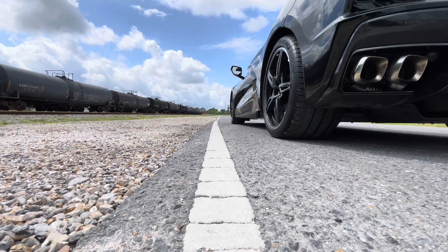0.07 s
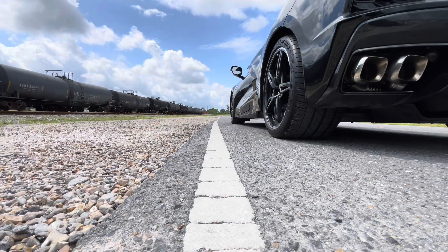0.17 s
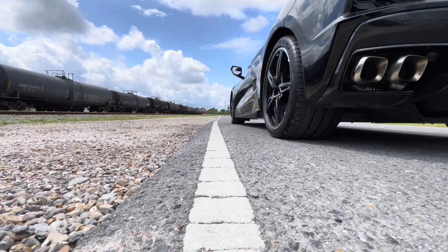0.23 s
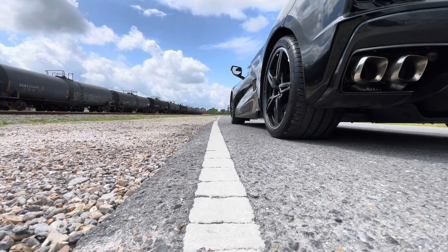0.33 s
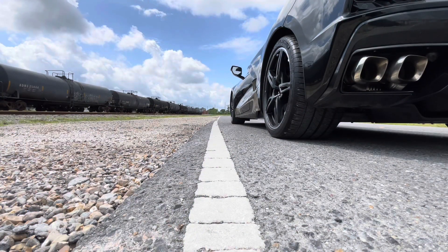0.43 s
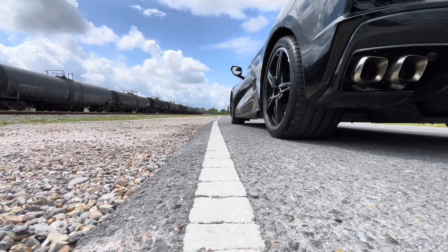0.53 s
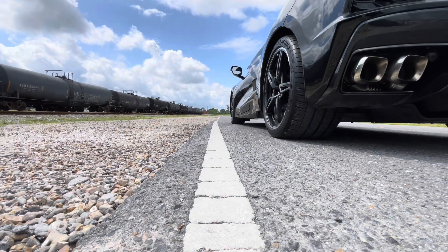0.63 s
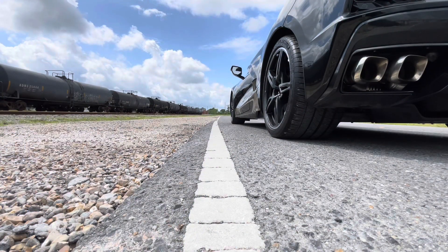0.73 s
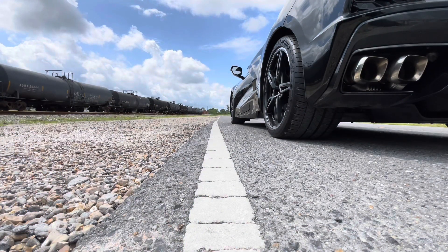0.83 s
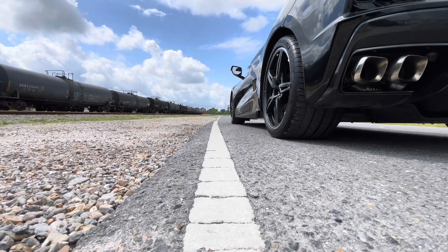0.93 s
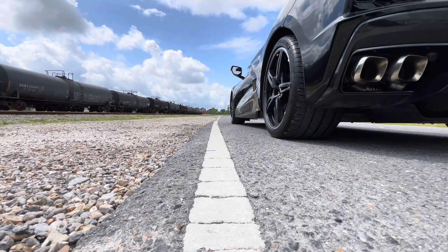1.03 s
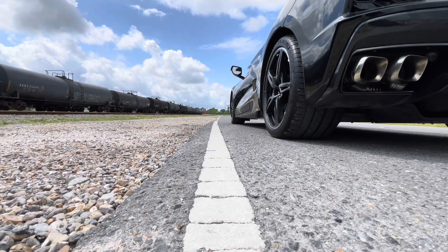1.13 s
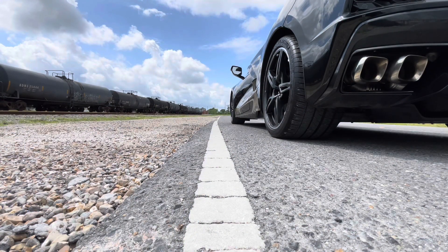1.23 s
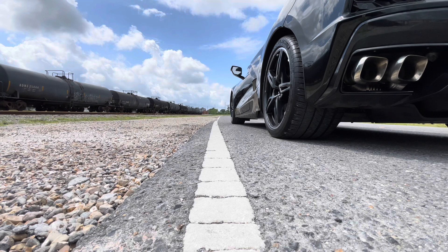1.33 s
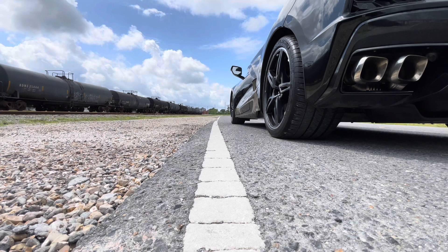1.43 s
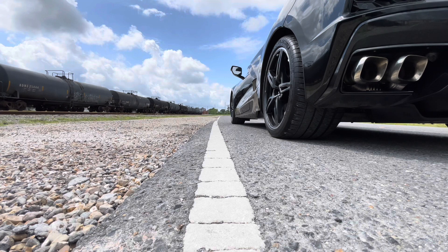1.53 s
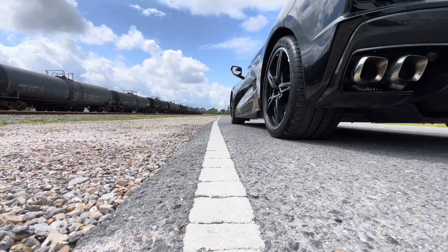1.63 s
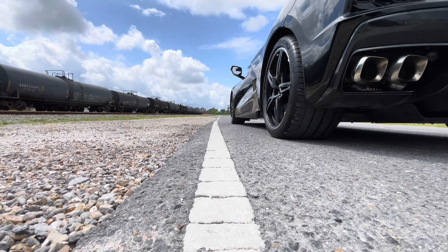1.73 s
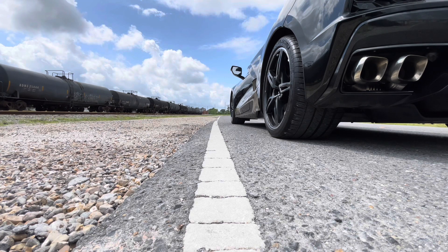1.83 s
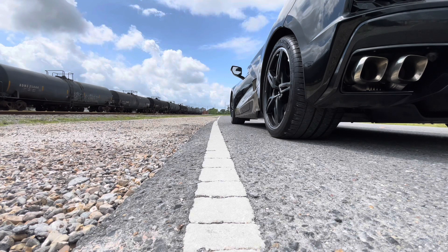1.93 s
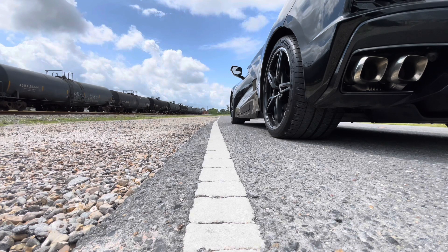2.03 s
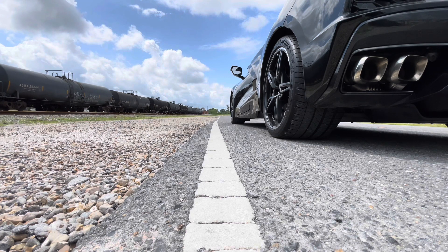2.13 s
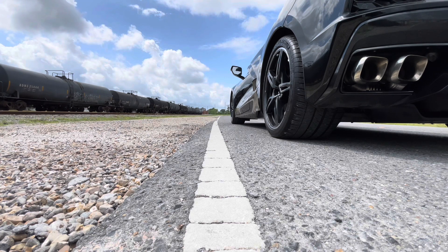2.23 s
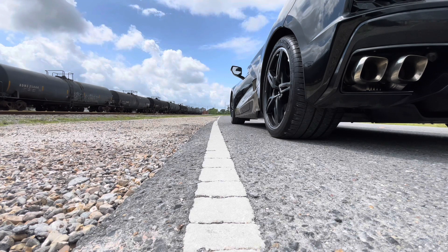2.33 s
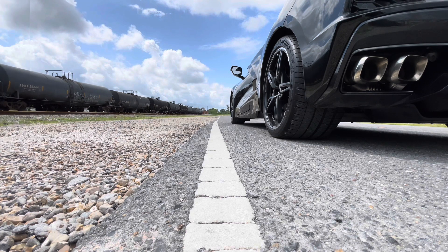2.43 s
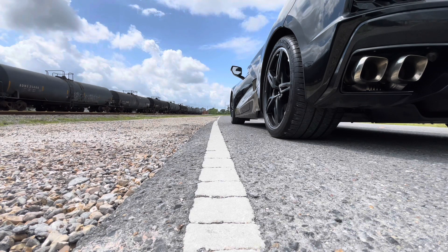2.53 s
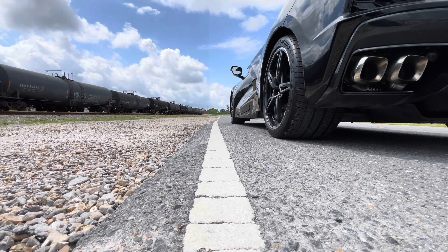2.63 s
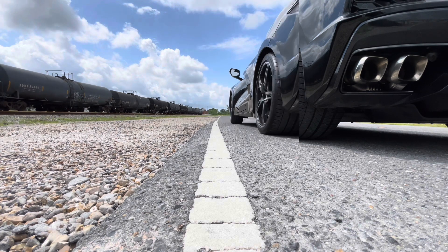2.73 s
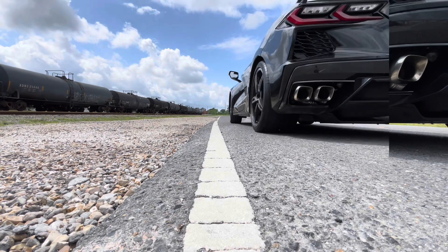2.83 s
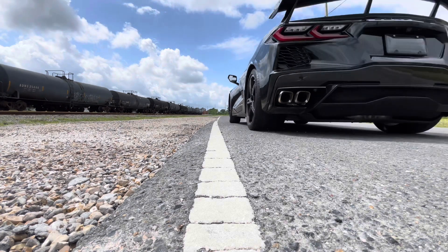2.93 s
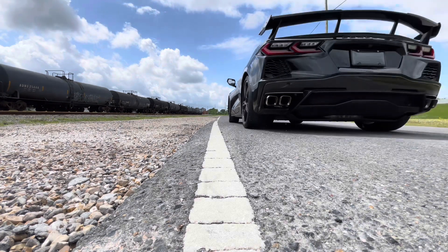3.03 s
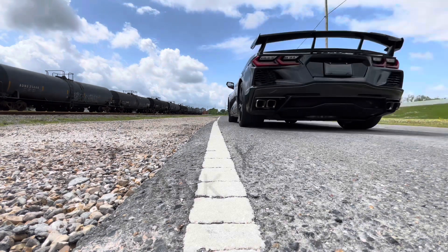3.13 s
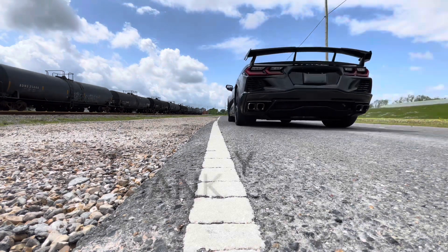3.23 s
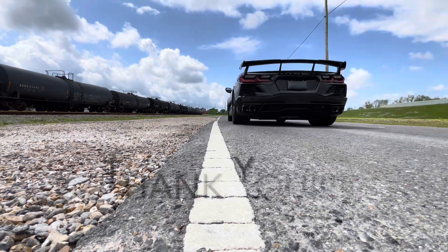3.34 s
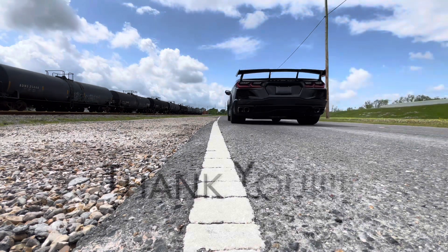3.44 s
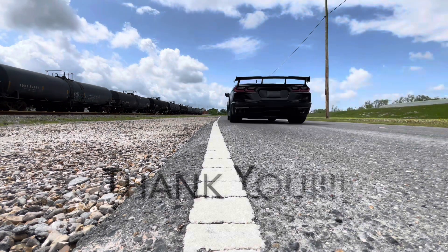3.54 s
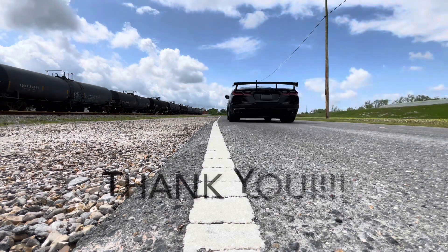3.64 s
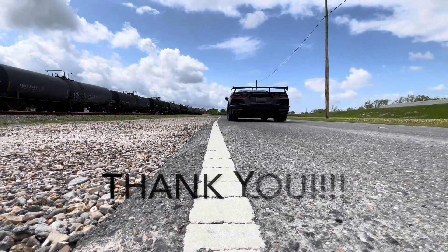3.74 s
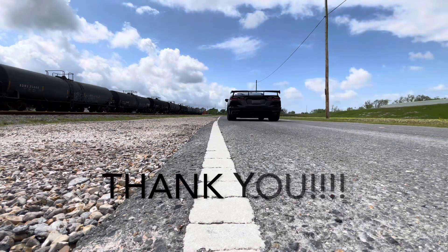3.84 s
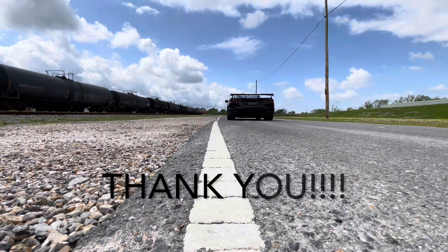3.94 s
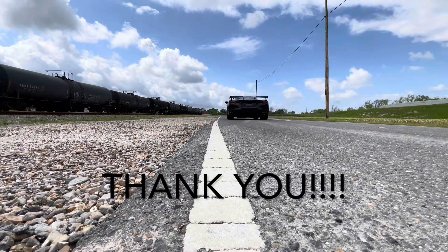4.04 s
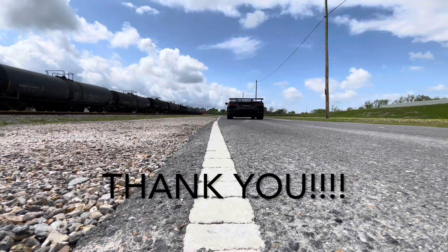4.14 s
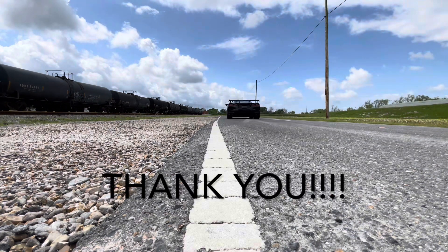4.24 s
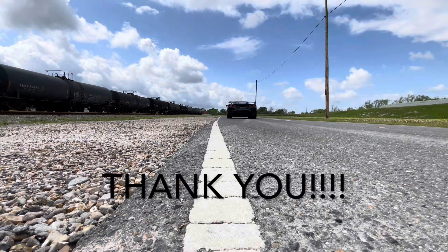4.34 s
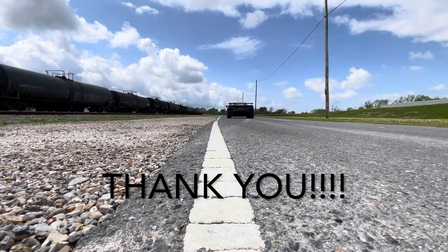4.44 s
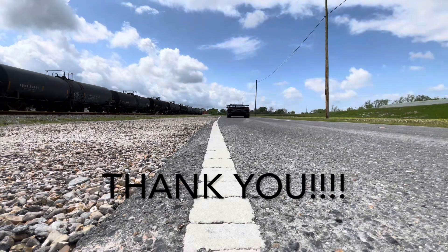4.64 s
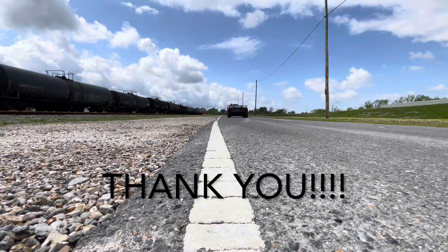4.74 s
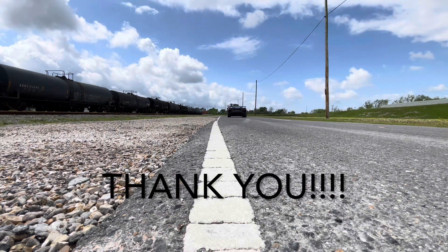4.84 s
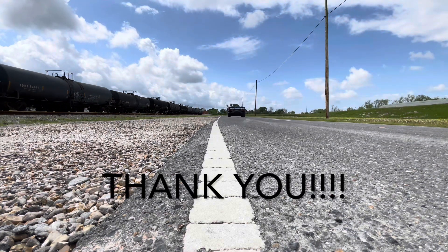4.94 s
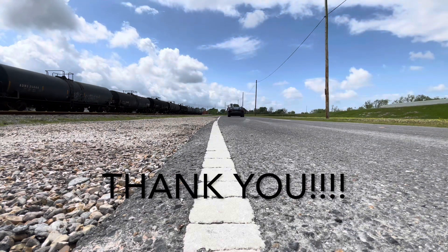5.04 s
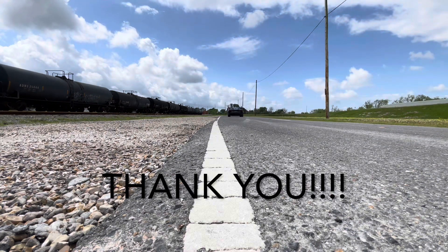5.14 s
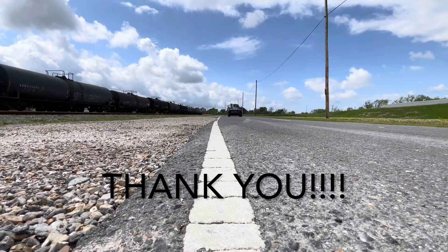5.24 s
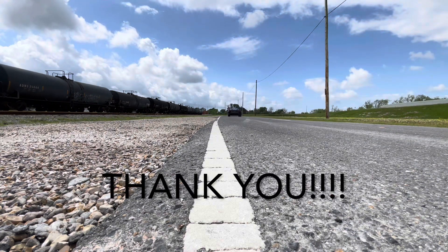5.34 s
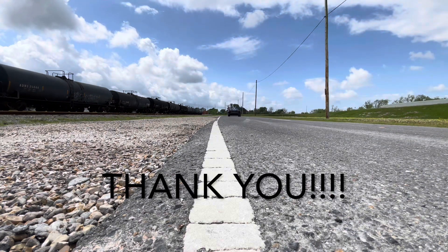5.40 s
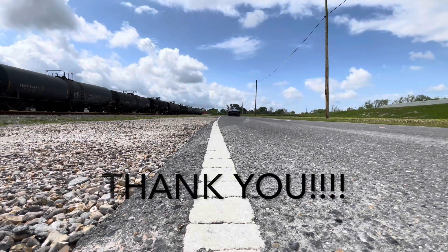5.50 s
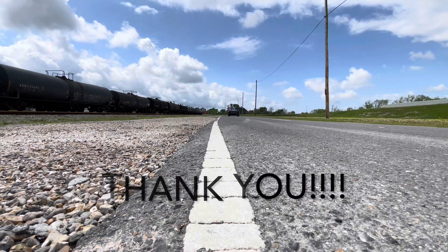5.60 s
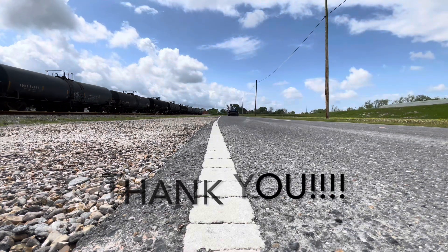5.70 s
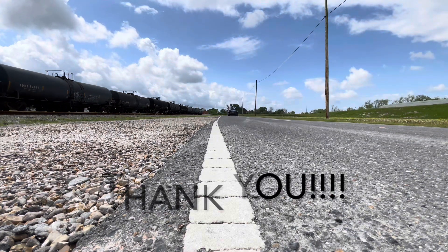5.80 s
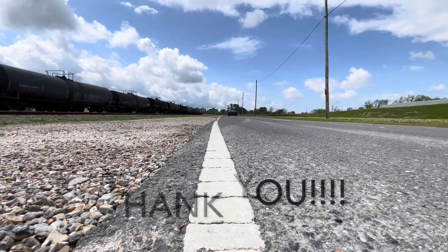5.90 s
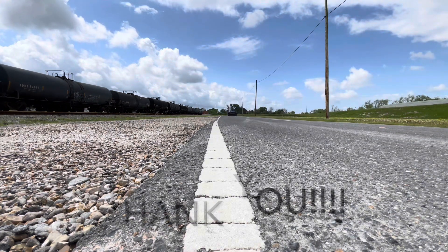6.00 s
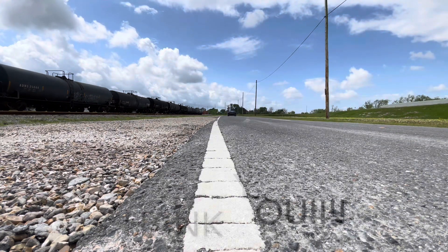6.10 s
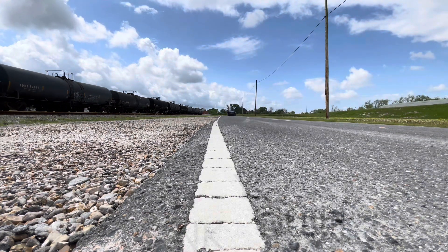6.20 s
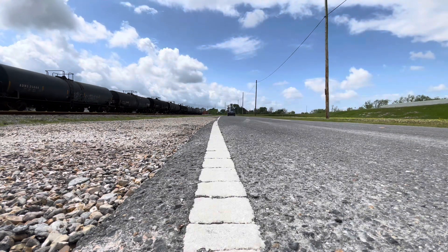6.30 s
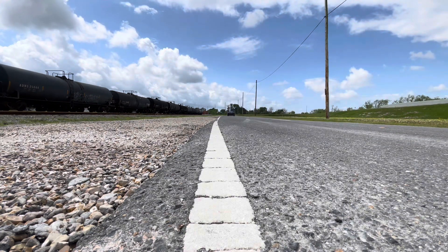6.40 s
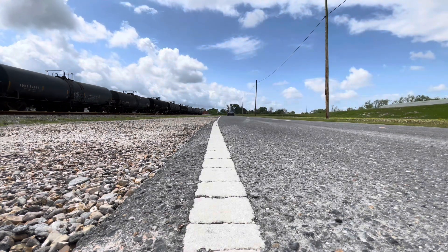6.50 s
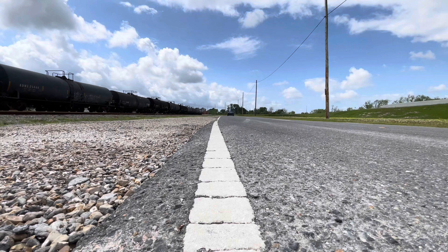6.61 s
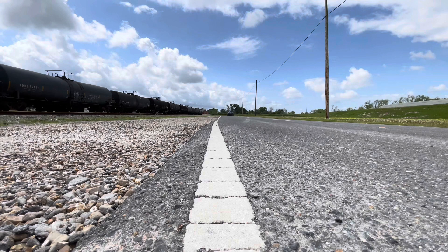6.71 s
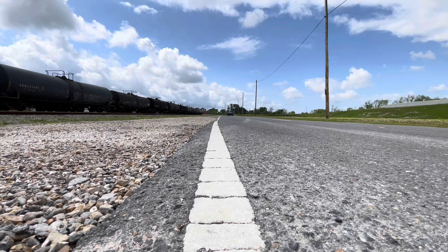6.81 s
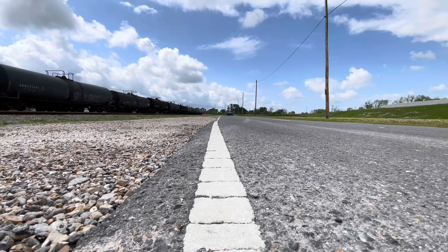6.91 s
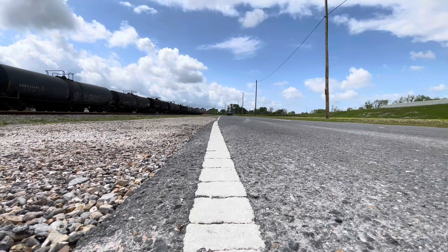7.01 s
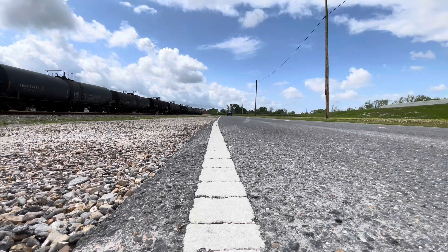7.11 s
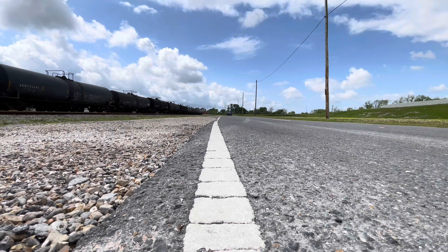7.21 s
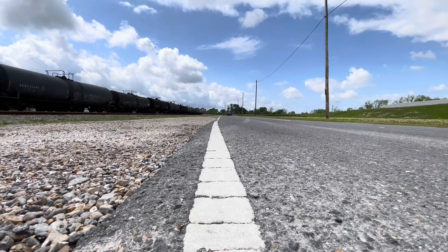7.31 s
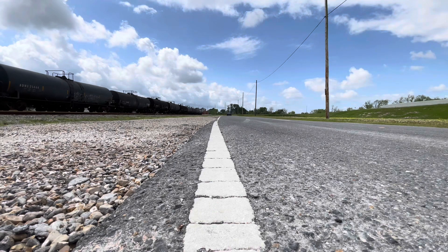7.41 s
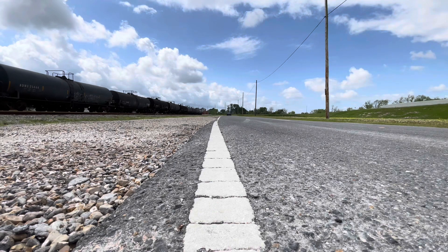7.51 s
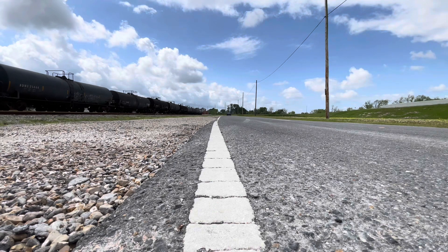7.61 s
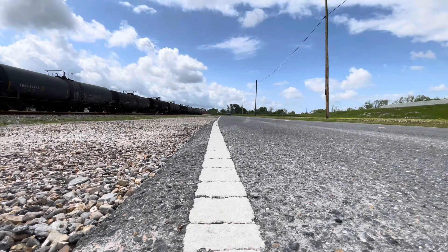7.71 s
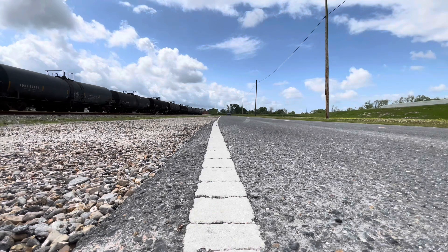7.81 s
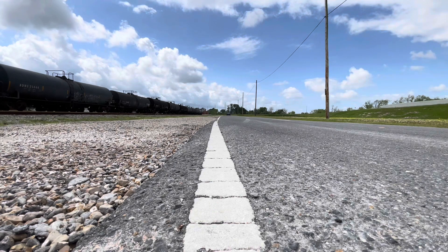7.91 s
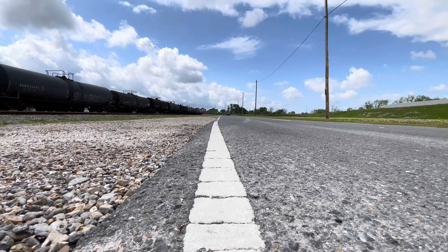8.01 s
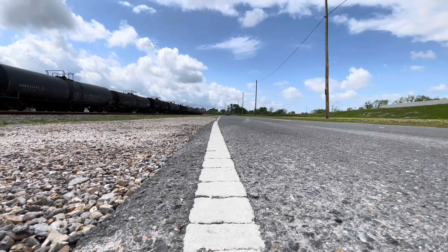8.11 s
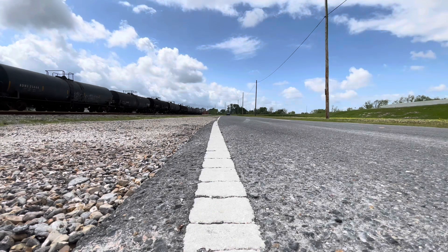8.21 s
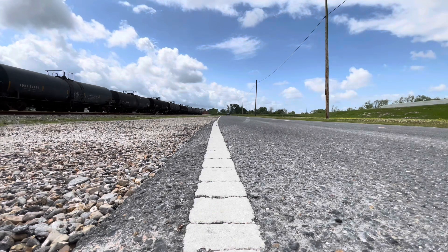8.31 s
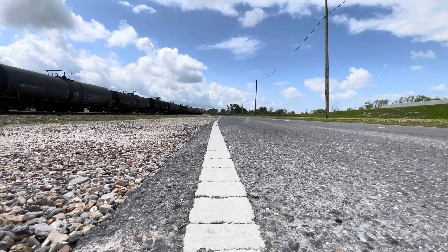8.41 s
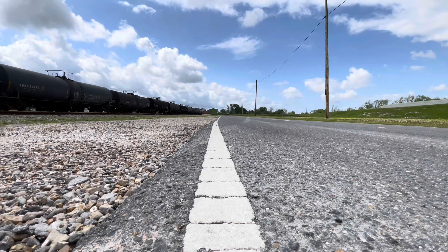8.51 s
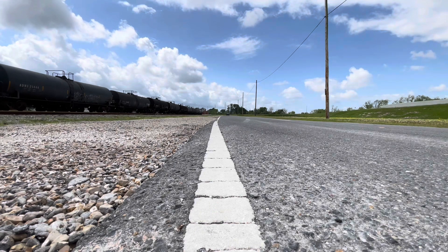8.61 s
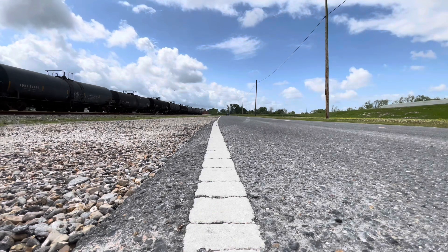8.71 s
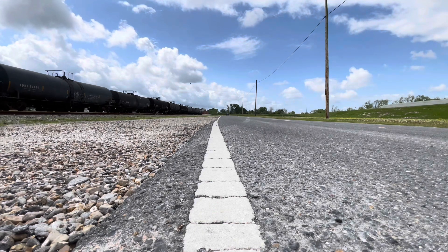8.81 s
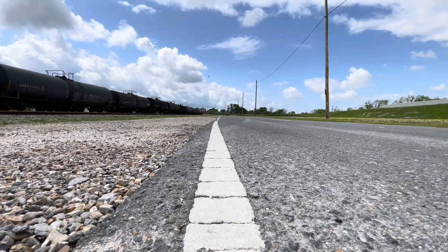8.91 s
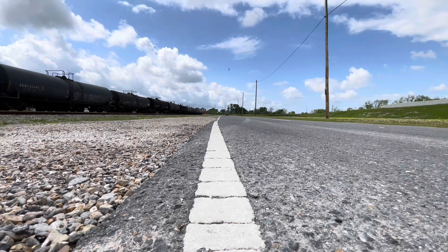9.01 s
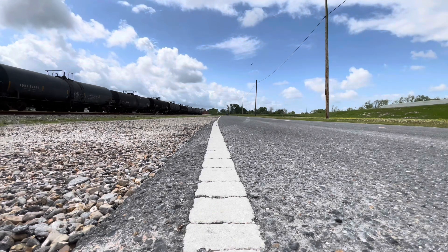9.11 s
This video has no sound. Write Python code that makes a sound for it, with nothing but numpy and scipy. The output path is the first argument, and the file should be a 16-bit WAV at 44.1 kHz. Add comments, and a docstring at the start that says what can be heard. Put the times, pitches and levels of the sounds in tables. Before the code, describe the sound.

A V8 sports car burbles unevenly close by, then chirps its tyres and roars away through two upshifts with cracking exhaust, fading down the road.

```python
"""A V8 sports car burbles on its launch limiter: two throbbing sines, ringing thuds, puffing noise, pops.
Its tyres chirp as short rough tones, then it launches and pulls away: a sum of engine orders, firing
shocks and pulsing gas noise, set by throttle and distance. Bursts of noise crack at lifts and two
upshifts, with a faint whistle after the first; later a breeze rumbles as low noise on the microphone."""
import sys
import numpy as np
from scipy import signal
from scipy.fft import rfft, irfft, next_fast_len
from scipy.io import wavfile
from scipy.ndimage import uniform_filter1d

SR = 44100
rng = np.random.default_rng(int(sys.argv[2]) if len(sys.argv) > 2 else 0)


def to_wav(s):
    """Save 16-bit WAV."""
    ch = np.atleast_2d(s).T  # columns
    pcm = np.round(np.clip(ch, -1, 1) * 32767)  # PCM
    wavfile.write(sys.argv[1], SR, pcm.astype(np.int16))


N = 403515


def amp(db):
    """Decibels to gain."""
    return 10 ** (np.asarray(db) / 20)


def unit(x):
    """Scale to rms 1."""
    return x / np.sqrt(np.mean(x ** 2) + 1e-20)


def even(x):
    """Divide all channels by the running rms of the first."""
    power = np.atleast_2d(x)[0] ** 2
    return x / np.sqrt(np.abs(uniform_filter1d(power, size=6000)) + 1e-12)


def bump(x, centre, half_width):
    """Gaussian bell of height 1, down to 1/e at half_width."""
    return np.exp(-((x - centre) / half_width) ** 2)


def along(points, hz):
    """Interpolate (f/Hz, value) points on a log frequency axis."""
    f, v = np.transpose(points)
    return np.interp(np.log(hz + 1), np.log(f + 1), v)


def curves(rows):
    """One value per sample for each column after the time."""
    s, *cols = np.transpose(rows)
    return [np.interp(np.arange(N) / SR, s, c) for c in cols]


def wobble(rate):
    """Slow random curve, rate knots a second."""
    return np.interp(np.arange(N) * rate / SR, np.arange(2048), rng.standard_normal(2048))


def strike(s, rise_s, decay_s):
    """Two-sided exponential envelope, 1 at time s."""
    t = np.arange(N) / SR - s
    return np.exp(-np.minimum(np.abs(t) / np.where(t < 0, rise_s, decay_s), 20))


def filtered(x, response):
    """Multiply the spectrum of x by a function of frequency."""
    m = next_fast_len(N + 8192, True)
    return irfft(rfft(x, m) * response(np.fft.rfftfreq(m, 1 / SR)), m)[..., :N]


def colour(x, spectrum):
    """Filter x by a (f/Hz, gain/dB) curve."""
    return filtered(x, lambda hz: amp(along(spectrum, hz)))


def band(x, lo_hz, hi_hz):
    """Steep band-pass."""
    return filtered(x, lambda hz: 1 / np.sqrt((1 + (lo_hz / (hz + 1)) ** 20) * (1 + (hz / hi_hz) ** 20)))


def ringing(x, modes):
    """Resonators of alternating sign in parallel: (f/Hz, bandwidth/Hz, gain/dB)."""
    def response(f):
        total = 0
        for k, (centre, width, db) in enumerate(modes):
            damping = 1j * f * width
            total = total + (-1) ** k * amp(db) * damping / (centre * centre - f * f + damping)
        return total

    return filtered(x, response)


def rush(spectrum):
    """Coloured mid and side noise, mid at rms 1."""
    # stereo width of noise: f/Hz, side minus mid/dB
    width = [(60, -15), (120, -11), (360, -2.5), (700, 2), (1200, 0.5), (2100, -6.5), (3800, -1),
             (7000, -6), (9500, 4.5), (12000, 1)]
    noise = colour(rng.standard_normal((2, N)), spectrum)
    return np.array([noise[0], colour(noise[1], width)]) / np.std(noise[0])


def stereo(mid_side, spread_db, pan_db):
    """Left and right from mid and side; pan_db is left minus right."""
    mid, side = mid_side[0], mid_side[1] * amp(spread_db)
    return np.array([(mid + side) * amp(pan_db / 2), (mid - side) * amp(-pan_db / 2)])


def puffs(cycle, scatter_db, sharpness, count):
    """Gas flow: count puffs a cycle, each of its own size, each decaying until the next."""
    stroke = cycle * count
    size = amp(scatter_db * rng.standard_normal(8192))[stroke.astype(int)]
    return unit(size * np.exp(-sharpness * (stroke % 1)))


def pull_away():
    """Engine orders, shocks and firing-pulsed gas noise in four registers, dulling with distance."""
    # engine under way: t/s, rate/(cycles/s)
    speed = [(2.7, 21.7), (2.8, 23.5), (2.9, 27), (3.05, 29.2), (3.25, 27.5), (3.45, 23.2), (3.62, 22.3),
             (3.77, 28.7), (4, 35.3), (4.48, 51.6), (4.64, 53.2), (4.7, 47), (4.756, 43.6), (4.83, 37.3),
             (4.95, 31.5), (5.07, 32.7), (5.18, 32.8), (5.3, 34.8), (6.6, 48), (6.83, 49), (6.95, 35.7),
             (7.41, 37.5), (8.55, 42.7), (9.15, 42)]
    # launch, lift and pulls in three gears: t/s, throttle/(0-1)
    throttle = [(2.5, 0.31), (2.715, 0.45), (2.755, 0.86), (2.95, 0.87), (3.12, 0.8), (3.54, 0.09),
                (3.64, 0.09), (3.85, 0.44), (4.31, 0.69), (4.66, 0.64), (4.72, 0.29), (5.21, 0.27),
                (5.84, 0.58), (6.75, 0.78), (7.27, 0.6), (7.64, 0.79), (8.55, 0.91), (8.71, 0.63),
                (9.15, 0.58)]
    # exhaust midrange: t/s, level/dB
    bark_level = [(2.45, -24.5), (2.68, -20), (2.97, -23), (3.22, -34), (3.65, -37.5), (3.8, -29),
                  (3.95, -24.5), (4.15, -26.5), (4.6, -29), (4.7, -33.5), (4.8, -35.5), (4.9, -30.5),
                  (5, -35), (5.2, -31.5), (5.35, -34), (6.3, -34), (7, -31.5), (7.4, -32), (8, -30),
                  (8.52, -31), (8.85, -37.5)]
    # gas noise close by and far off: f/Hz, density/dB
    near_gas, far_gas = [(24, -42), (40, -12), (102, -1.5), (135, -6.5), (211, 3.5), (241, -29), (344, 0),
                         (581, -5.5), (727, -8), (798, -12), (1250, -17.5), (2800, -22.5), (3500, -7),
                         (4550, -57), (7700, -120)], [(35, -29), (60, -21), (110, -29), (250, 8), (340, 12),
                                           (450, 8.5), (620, 12), (780, -6), (1000, -8), (1400, -10),
                                           (1900, -10.5), (2600, -18.5), (3500, -32)]
    # tyre and jet hiss close by and far off: f/Hz, density/dB
    near_hiss, far_hiss = [(1500, -37), (2600, -25), (2900, -7.5), (4200, 3), (6100, 3), (7500, -0.5),
                           (9300, -20), (11300, -3), (12500, -7.5)], [(1500, -7.5), (2600, 6), (3700, 3.5), (5200, -2.5),
                                              (6200, -2.5), (7400, -8.5), (8900, -6.5), (11300, -40),
                                              (12500, -23)]
    # per register: level at full throttle at zero distance, drop when shut, loss far away
    boom_full_db, boom_shut_db, boom_far_db = -18, 19, 28
    rasp_full_db, rasp_shut_db, rasp_far_db = -17, 26.5, 24
    hiss_full_db, hiss_shut_db, air_db_per_m = -26, 28.5, 0.27
    # noisy shares (0-1): steady, added close by, added while revs fall
    boom_rough, bark_rough, rasp_rough = (0.08, 0.04, 0.12), (0.1, 0.26, 0.02), (0.68, 0, .15)
    half_loss_m, gas_dull_m, hiss_dull_m, shock_reach_m = 50.2, 9, 14.8, 13
    blur_share, blur_m, blur_reach_m = .27, 135, 20  # far off, the note blurs into noise
    full_overrun_hz_per_s = 14
    # base pan and spread, scaled or offset per register below
    pan_near_db, pan_far_db, spread_near_db, spread_far_db, centre_m = -5.5, -1.5, 5, -8.5, 6.1

    rate, = curves(speed)
    shut = 1 - curves(throttle)[0]
    metres = distance()
    remote = metres / (metres + half_loss_m)
    close = bump(metres, 0, gas_dull_m)
    near = np.clip(0.074 + 0.99 * close, 0, 1)
    fall_hz_per_s = uniform_filter1d(-np.gradient(rate) * SR, size=4000)
    overrun = np.clip(fall_hz_per_s / full_overrun_hz_per_s, 0, 1)

    boom_db = boom_full_db - boom_shut_db * shut - boom_far_db * remote + 0.84 * wobble(8.1)
    boom_db += 6 * bump(rate, 33.7, 1.2)  # fifth order meets the silencer's resonance
    bark_db = curves(bark_level)[0] + 2.0 * wobble(11)
    drift_db = 1.5 * remote * wobble(7)  # moving air: distant treble drifts
    rasp_db = rasp_full_db - rasp_shut_db * shut - rasp_far_db * remote + drift_db
    hiss_db = hiss_full_db - hiss_shut_db * shut - air_db_per_m * metres + drift_db

    # from the right towards straight ahead
    aside = centre_m / (centre_m + metres)
    pan_db = pan_far_db + (pan_near_db - pan_far_db) * aside
    spread_db = spread_far_db + (spread_near_db - spread_far_db) * aside

    cycle = np.cumsum(rate * (1 + 0.0033 * wobble(45))) / SR
    note = engine_note(rate, cycle, metres)
    flow = surge(cycle, metres) * puffs(cycle, scatter_db=0.6, sharpness=0.46, count=8)
    gas = flow * (np.sqrt(near) * rush(near_gas) + np.sqrt(1 - near) * rush(far_gas))

    def voice(lo_hz, hi_hz, shares):
        """One exhaust register: clean orders in mid, plus a varying share of gas noise."""
        steady, close_by, falling = shares
        blur = blur_share * bump(metres, blur_m, blur_reach_m)
        rough = np.clip(steady + close_by * close + falling * overrun + blur, .02, .98)
        clean = even(band(note, lo_hz, hi_hz))
        noisy = even(band(gas, lo_hz, hi_hz))
        return np.sqrt(rough) * noisy + np.outer([1, 0], np.sqrt(1 - rough) * clean)

    boom = stereo(amp(boom_db) * voice(52, 189, boom_rough), spread_db + 4.0, 0.18 * pan_db)
    bark = stereo(amp(bark_db) * voice(221.4, 850, bark_rough), spread_db, 0.63 * pan_db)

    sharp = .78 * bump(metres, 0, shock_reach_m)  # power share of shocks in the rasp
    tearing = np.outer([1, 0], even(band(shocks(cycle, metres), 810, 2070)))
    rasp = np.sqrt(1 - sharp) * voice(809, 2460, rasp_rough) + np.sqrt(sharp) * tearing
    rasp = stereo(amp(rasp_db) * rasp, spread_db + 3 * sharp, 1.47 * pan_db)

    crisp = np.clip(0.6 * np.exp(-metres / hiss_dull_m), 0, 1)
    hiss = np.sqrt(crisp) * rush(near_hiss) + np.sqrt(1 - crisp) * rush(far_hiss)
    hiss = amp(hiss_db) * unit(1 + 2.0 * flow) * hiss
    hiss = stereo(hiss, 0.21 * spread_db, -.3 * pan_db)

    launched, = curves([(2.42, 0.05), (2.68, 0.96)])
    shift_gain = amp(-4.5 * bump(np.arange(N) / SR, 6.872, .02))  # second upshift interrupts the drive
    return launched * shift_gain * (boom + bark + rasp + hiss)


def distance():
    """Metres to the car: parked close by, then uniform acceleration from a rolling start."""
    roll_s, start_m, start_m_per_s, accel_m_per_s2 = 2.855, 1.73, 3.7, 5.13
    t = np.maximum(np.arange(N) / SR - roll_s, 0)
    return start_m + start_m_per_s * t + accel_m_per_s2 * t ** 2 / 2


def engine_note(rate, cycle, metres):
    """Sine orders of the engine cycle, swept through tailpipe resonances, each wavering in level."""
    # cross-plane firing pattern: order/(multiple of cycle rate), level/dB
    firing = [(1, -32), (2, 8), (3, -1.5), (4, -9), (5, -0.5), (6, -2), (7, -11), (8, 6.5), (9, -2.5),
              (10, 8.5), (11, 2), (12, 6.5), (13, 0.5), (14, 4), (15, -5.5), (16, 8), (17, -3), (18, 6.5),
              (19, -1.5), (20, 2.5), (21, 0.5), (22, 3.5), (23, -15), (24, 6.5), (26, -3), (36, 0)]
    # tailpipe colour under load: f/Hz, gain/dB
    pipe = [(30, -27), (55, 2.5), (80, -2), (110, -4), (150, 7), (200, 6), (255, 0), (335, 1.5), (430, -4),
            (520, 1), (620, 5), (780, -12), (950, -9.5), (1300, -7.5), (2000, -18.5)]
    # uneven orders that growl close behind the car: order/(multiple of cycle rate)
    growl_orders = [2, 3, 5, 7, 8]
    # one row per growl order: lift at zero distance/dB, reach/m
    growl = [(8, 23), (17.5, 12.3), (22, 9.3), (19, 12.4), (-2.5, 11)]
    # resonances and dips, each at its own distance: f/Hz, half width/Hz, lift/dB, distance/m, reach/m
    drone_rows = [(257, 20, 5, 13, 2), (322, 17.3, 8, 41, 84), (305, 18, 3, 80, 51), (443, 49, 5, 92, 18),
                  (350, 17.6, 6, 11, 28), (520, 64, -6, 21, 10), (184, 20, 6.5, 27.5, 18),
                  (633, 38, -13.5, 109, 40), (209, 19, 14, 8.8, 2.25), (257, 45, 9, 7.9, 1.4),
                  (202, 11, 11, 25, 3), (343, 18, 4, 19, 4.8), (590, 60, -2.5, 33, 5),
                  (440, 59, -11, 25, 3.3), (582, 30, -2.5, 60, 11), (655, 36, 7, 73, 14),
                  (560, 200, -8, 125, 11), (254, 14, 5, 120, 9.6)]

    knots = np.arange(0, N, 64)
    rate, metres = rate[knots], metres[knots]
    lift_db = {k: db * bump(metres, 0, reach_m) for k, (db, reach_m) in zip(growl_orders, growl)}
    drones = [(hz, half_hz, db * bump(metres, best_m, reach_m))
              for hz, half_hz, db, best_m, reach_m in drone_rows]
    note = np.zeros(N)
    for k in range(1, 37):
        level_db = np.interp(k, *np.transpose(firing)) + along(pipe, k * rate) + lift_db.get(k, 0)
        if 3 < k < 20:
            level_db = level_db + sum(db * bump(k * rate, hz, half_hz) for hz, half_hz, db in drones)
        level_db = np.interp(np.arange(N), knots, level_db) + 2.4 * wobble(7)
        note += amp(level_db) * np.sin(2 * np.pi * (k * cycle + rng.random()))
    return note


def shocks(cycle, metres):
    """Each firing is an impulse that rings the tailpipes; the banks fire unevenly, so the rasp tears."""
    # firing order by bank: bank/(1 = far)
    banks = [0, 1, 0, 0, 1, 0, 1, 1]
    # tailpipe resonances: f/Hz, bandwidth/Hz, gain/dB
    tips = [(910, 250, -5.5), (1130, 84, -0.5), (1230, 96, 1), (1414, 124, -0.5), (1680, 104, -4),
            (2190, 770, -15)]
    far_bank_db, far_bank_delay_s, scatter_db = -9.5, 0.001323, 2
    jitter_s, slip_jitter_s, slip_reach_m = .00004, .00012, 6  # slipping tyres add timing scatter

    at = np.flatnonzero(np.diff(np.floor(8 * cycle)))
    far_bank = np.resize(banks, len(at))
    timing, strength = rng.standard_normal((len(at), 2)).T
    size = amp(far_bank_db * far_bank + scatter_db * strength) * surge(cycle[at], metres[at])
    scatter_s = jitter_s + slip_jitter_s * bump(metres[at], 0, slip_reach_m)
    late_s = far_bank_delay_s * far_bank + scatter_s * timing
    hit = np.clip(at + np.round(late_s * SR).astype(int), 0, N - 1)
    return ringing(np.bincount(hit, size, N), tips)


def surge(cycle, metres):
    """Unequal cylinders: flow surges once a cycle and once a crank turn; the former peaks at 14 m."""
    cycle_depth = .17 + .2 * bump(metres, 14, 5)
    return 1 + cycle_depth * np.cos(2 * np.pi * cycle) + .05 * np.cos(4 * np.pi * cycle)


def limiter_burble():
    """Held on the limiter: two low orders dip at its cuts amid uneven thuds, puffing noise, pops, bay hiss."""
    # engine held: t/s, rate/(cycles/s)
    held_speed = [(0, 32), (.2, 29.2), (.5, 27.4), (.8, 25.5), (1.3, 24.5), (1.7, 23.5), (2.1, 22.2),
                  (2.6, 22)]
    # limiter cuts as level dips, negative = rise: t/s, half length/s, depth/dB
    cuts = [(0, 0.03, 2), (0.153, 0.032, 7), (0.321, 0.032, 2), (0.569, 0.028, 17), (0.816, 0.083, 8),
            (1.054, 0.022, 8), (1.547, 0.037, 7), (1.88, 0.031, -2)]
    # silencer resonances rung by firings: f/Hz, bandwidth/Hz, gain/dB
    throb = [(59, 14.7, -1), (118.5, 35.4, -6), (173, 36, -11), (293, 116, -21.5)]
    # burble and engine bay noise: f/Hz, density/dB
    burble_tone, bay_tone = [(110, -54), (190, -12.5), (285, -3.5), (357, -16.5), (523, -5), (566, -7.5),
                             (606, -11), (742, -16.5), (803, -11), (1010, -29), (1250, -22), (1650, -32),
                             (1750, -41.5), (2390, -34.5), (2800, -55), (3640, -76), (6160, -120)], [(1500, -6), (2800, -7.5), (4000, -3), (5800, -1), (7200, -4.5),
                                             (8200, -6.5), (8900, -6.5), (11300, -11), (12500, -16)]
    # muffled pops: t/s, level/dB
    pops = [(.329, -29), (0.474, -27.5), (.622, -34), (.719, -34), (0.93, -30), (.993, -49), (1.306, -47),
            (2.1, -30), (2.171, -26), (2.352, -31)]
    # pop noise: f/Hz, density/dB
    pop_tone = [(150, -25), (300, -2), (420, -1.5), (540, 3), (680, -22), (830, -3), (1000, -26),
                (2500, -38), (5000, -80)]
    crank_db, twice_db, thuds_db, burble_db, bay_db = -25.5, -26.5, -25.5, -37, -54
    release_start_s, release_rise_db = 2.367, 9  # burble swells as the limiter lets go
    thud_scatter_db, puff_decay_s, puff_share = 7, .009, .4
    pop_rise_s, pop_decay_s = 0.0011, 0.016

    t = np.arange(N) / SR
    cycle = np.cumsum(curves(held_speed)[0]) / SR
    cut_db = sum(depth_db * bump(t, s, half_s) for s, half_s, depth_db in cuts)
    release_db = release_rise_db * np.clip((t - release_start_s) / 0.15, 0, 1)

    # once and twice a crank turn
    crank_gain = amp(crank_db - cut_db + 1.9 * wobble(13))
    crank = crank_gain * np.sin(4 * np.pi * cycle + 0.57 * wobble(11))
    twice_gain = amp(twice_db + 0.27 * release_db - 0.32 * cut_db + 3.0 * wobble(26))
    twice = twice_gain * np.sin(8 * np.pi * cycle + 0.19 * wobble(12))

    firings = np.diff(np.floor(8 * cycle), prepend=0)
    size = amp(thud_scatter_db * np.clip(rng.standard_normal(N), -2, 1.6))
    gusts = unit(signal.lfilter([1], [1, -np.exp(-1 / (puff_decay_s * SR))], firings * size))
    thuds = even(band(ringing(firings * (size - size.mean()), throb), 38, 700))
    thuds = amp(thuds_db - .5 * cut_db) * thuds

    burble_gain = amp(burble_db + release_db - 0.27 * cut_db + 0.31 * wobble(19))
    burble = burble_gain * rush(burble_tone) * (1 - puff_share + puff_share * gusts)
    burble = burble + rush(pop_tone) * sum(amp(db) * strike(s, pop_rise_s, pop_decay_s) for s, db in pops)

    low = (np.sqrt(2) * (crank + twice) + thuds) * amp([[-1.2], [1.2]])
    left, right = stereo(band(burble, 180, 3100), spread_db=-6.5, pan_db=-6.0) + low
    # tailpipes stand to the right: the left channel hears them later
    pipes = np.array([np.roll(left, round(.00045 * SR)), right])
    bay = amp(bay_db) * rush(bay_tone) * puffs(cycle, scatter_db=1.5, sharpness=0.21, count=4)
    held, = curves([(2.55, 0.97), (2.75, 0.0062)])
    return held * (pipes + stereo(bay, spread_db=3.5, pan_db=1.0))


def tyres():
    """The tread sticks and slips: short rough tones, most of them climbing, at launch and one level at the lift."""
    # chirps: t/s, half length/s, level/dB, mid-chirp f/Hz, glide/(Hz/s)
    chirps = [(2.779, .022, -22, 1324, 2498), (2.835, .016, -19.5, 1080, 22000),
              (2.901, 0.046, -25.5, 1265, 7000), (2.96, .028, -22, 1240, 4000),
              (3.045, .03, -24.5, 1172, 3000), (3.11, .025, -25.5, 1300, 3000),
              (3.166, 0.023, -25.5, 1604, 4500), (3.342, 0.011, -29.5, 980, 2)]
    roughness_hz, octave_db = 116, -22
    out, t = np.zeros(N), np.arange(-SR // 8, SR // 8) / SR
    slip = band(rng.standard_normal((2, N)), 1, roughness_hz)
    slip = slip / np.sqrt(np.hypot(*slip))  # square-root compression evens the chirps' random swings
    for s, half_s, db, hz, glide in chirps:
        span = round(s * SR) + np.arange(len(t)) - len(t) // 2
        phase = 2 * np.pi * (hz * t + glide * t ** 2 / 2)
        swell = bump(t, 0, half_s)
        a, b = slip[:, span]
        tone = a * np.cos(phase) + b * np.sin(phase)
        overtone = amp(octave_db) * a * np.sin(2 * phase)
        out[span] += amp(db) * unit(swell * (tone + overtone)) * np.sqrt(np.mean(swell ** 2))
    return stereo([out, 0 * out], spread_db=0, pan_db=-9)


def cracks():
    """Unburnt fuel goes off in the pipes as the throttle snaps: noise bursts peaked at a silencer ring."""
    # cracks and thumps at lifts and upshifts: t/s, level/dB, corner f/Hz, treble fall/exponent, decay/s
    bursts = [(3.368, -25.5, 1520, 1.9, .006), (4.627, -25, 150, 4.6, .028), (4.673, -24, 180, 3.5, 0.0074),
              (4.826, -23, 1410, 4.2, 0.011), (6.826, -24.5, 1690, 3, 0.006),
              (6.898, -32, 4500, 3.5, 0.0043), (6.906, -21, 1280, 2.4, 0.0076),
              (6.931, -31.5, 1700, 2.1, 0.0084), (6.969, -37, 2200, 2.2, 0.0062),
              (6.995, -39, 2200, 2, 0.0076), (7.12, -38, 120, 3.1, 0.047), (7.402, -30.5, 1200, 3.1, .005)]
    rise_s, ring_hz, ring_half_width_hz, ring_db = 0.008, 623, 23, 11
    out, hz = np.zeros(N), np.fft.rfftfreq(SR, 1 / SR)
    ring = amp(ring_db * bump(hz, ring_hz, ring_half_width_hz))
    low_cut = 1 + (60 / (hz + 1)) ** 6
    for s, db, corner_hz, steepness, decay_s in bursts:
        body = ring / (1 + (hz / corner_hz) ** steepness)
        noise = irfft(rfft(rng.standard_normal(SR)) * body / low_cut)
        span = round(s * SR) + np.arange(SR) - SR // 2
        out[span] += amp(db) * strike(s, rise_s, decay_s)[span] * unit(noise)
    return out


def whistle():
    """Faint falling whistle after the first upshift: a sine, jittered in pitch and level."""
    # t/s, f/Hz, level/dB
    hz, db = curves([(5.02, 4150, -120), (5.07, 4080, -62), (5.16, 3990, -55),
                     (5.23, 3850, -63), (5.31, 3720, -68), (5.36, 3700, -120)])
    level = amp(db + 2.8 * wobble(60))
    return level * np.sin(2 * np.pi * np.cumsum(hz * (1 + 0.0047 * wobble(160))) / SR)


def breeze():
    """Light wind on the microphone: gusting low noise, side near mid in level, so channels differ."""
    # t/s, rumble level/dB
    wind = [(4.7, -53.5), (6.2, -41), (7.5, -43.5), (8.1, -40), (8.8, -43), (9.15, -45)]
    rumble_db, = curves(wind)
    # f/Hz, density/dB
    tone = [(20, -9), (35, -25), (48, -2), (58, -3.5), (90, -11.0), (200, -22.5), (600, -72)]
    rumble = rush(tone) * unit(amp(3.9 * wobble(6.7)))
    return stereo(amp(rumble_db) * rumble, spread_db=15.5, pan_db=0.5)


def scene():
    """The car held, the car leaving, and the air."""
    return limiter_burble() + pull_away() + tyres() + cracks() + whistle() + breeze()


def record(dry):
    """Soft-limit the highest peaks and keep the band below 12.5 kHz."""
    rounded = dry / (1 + np.abs(dry / .9) ** 6) ** (1 / 6)
    return filtered(rounded, lambda hz: hz < 12500)


dry = scene()
out = record(dry)
to_wav(out)
```